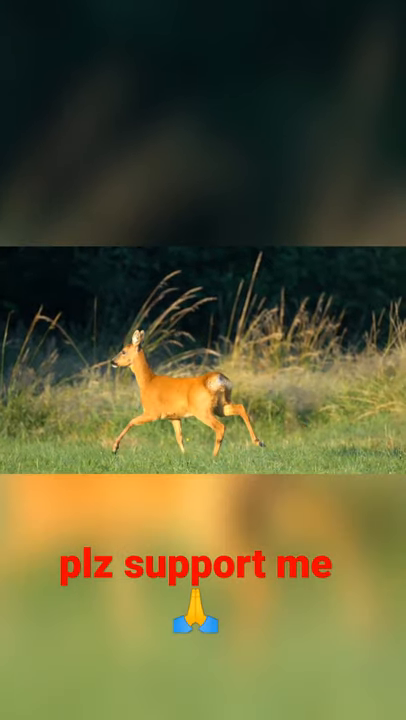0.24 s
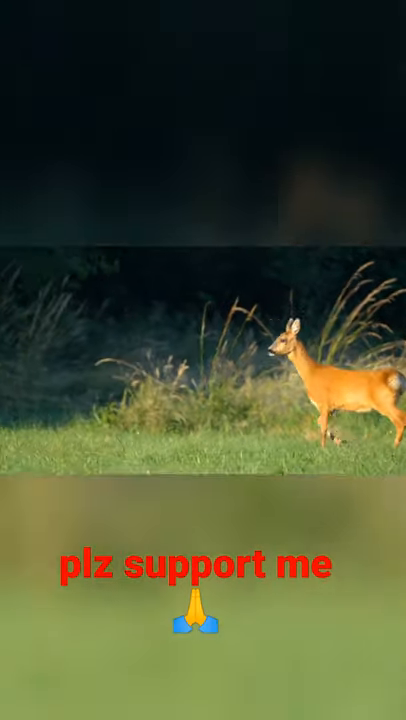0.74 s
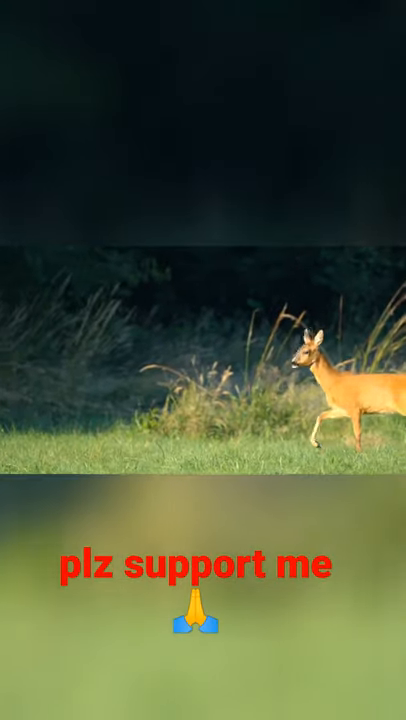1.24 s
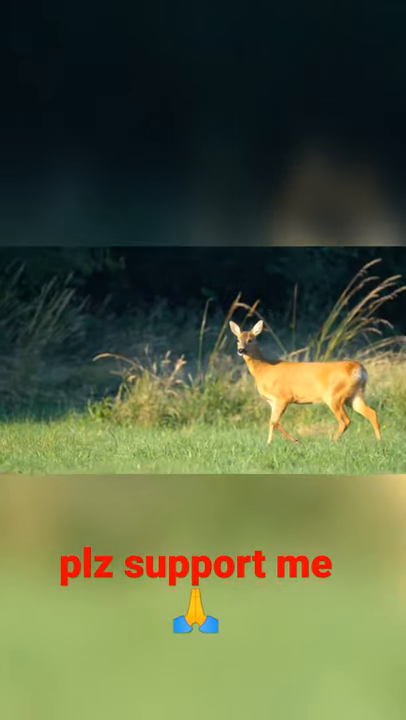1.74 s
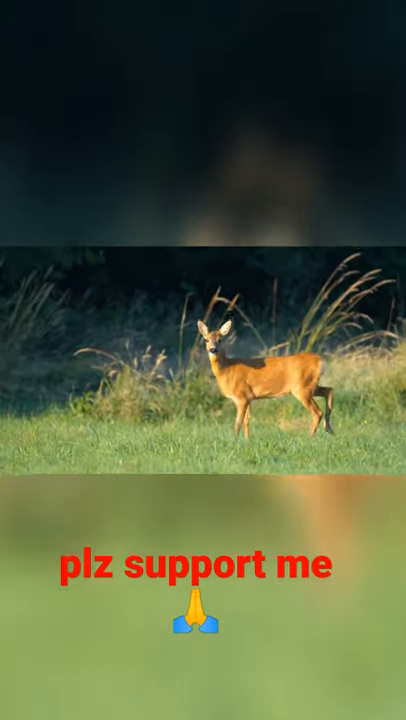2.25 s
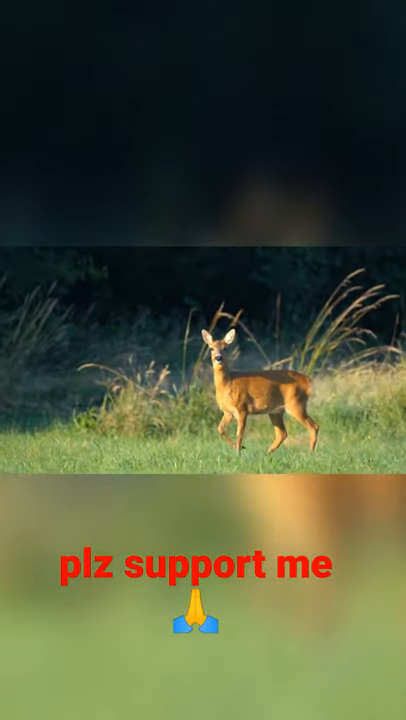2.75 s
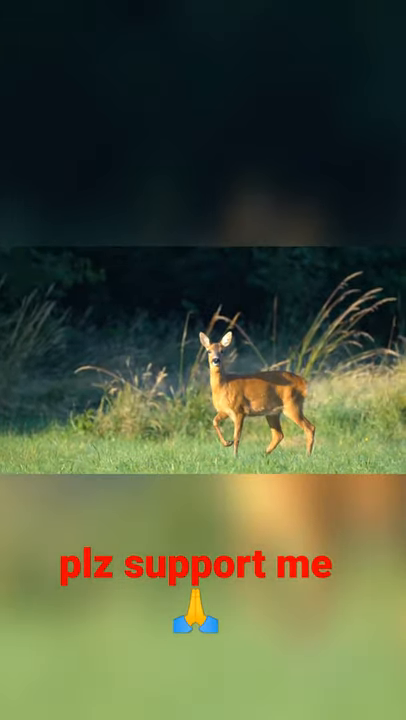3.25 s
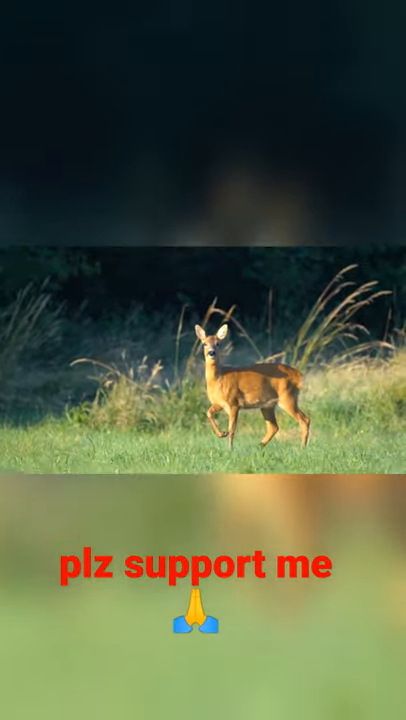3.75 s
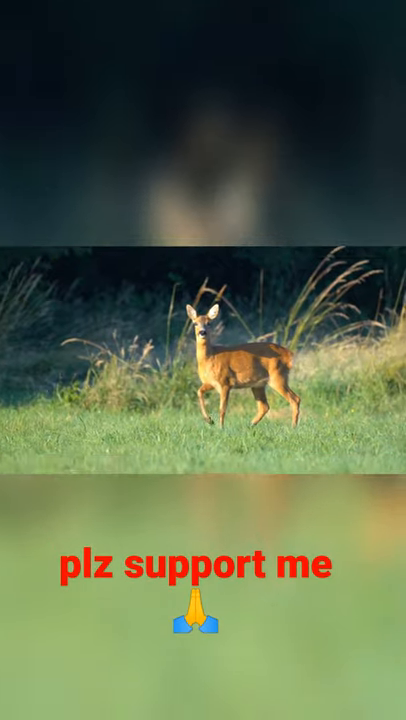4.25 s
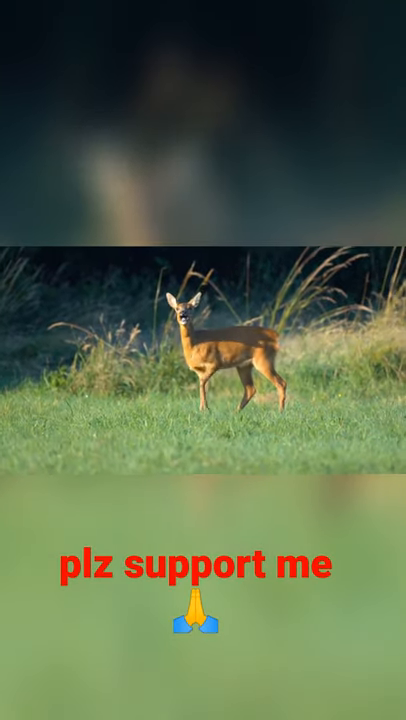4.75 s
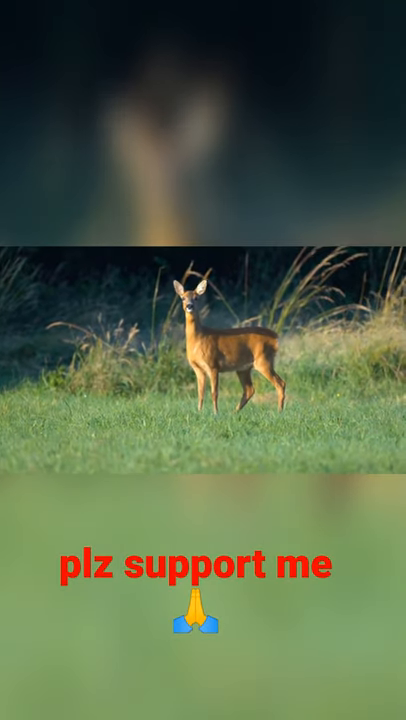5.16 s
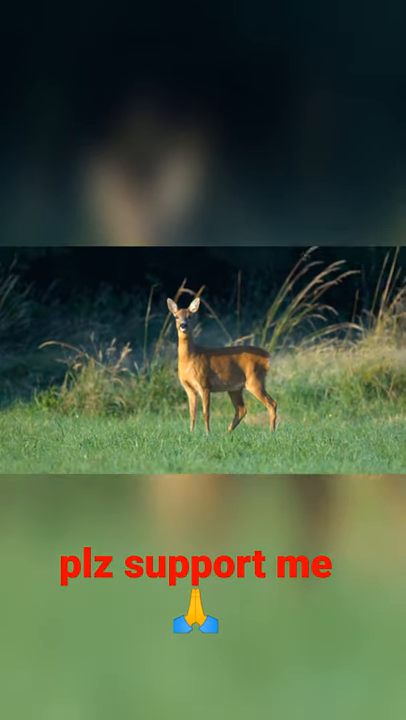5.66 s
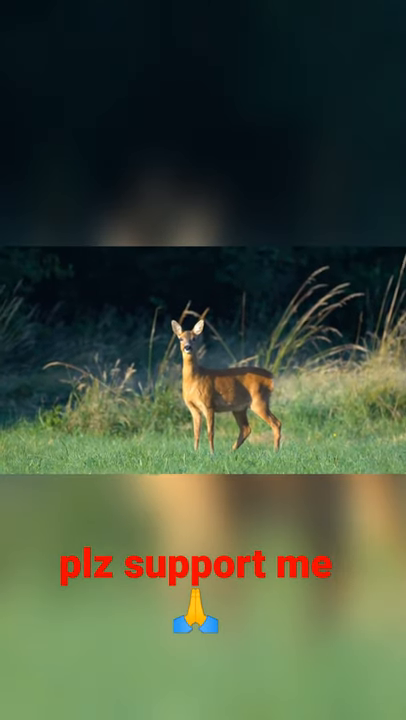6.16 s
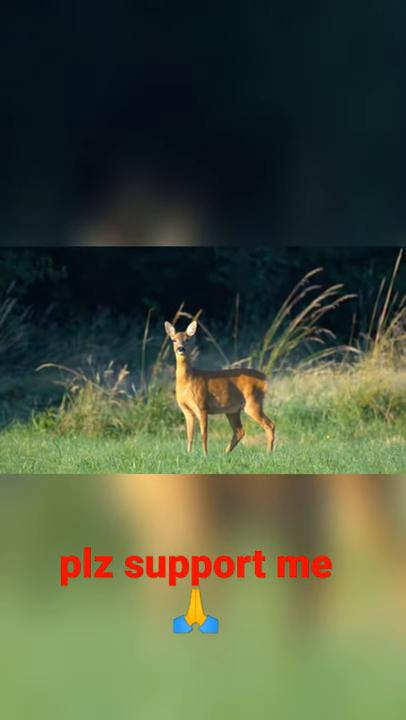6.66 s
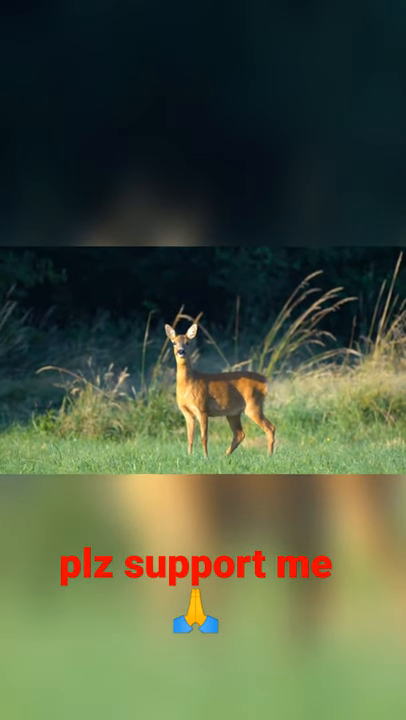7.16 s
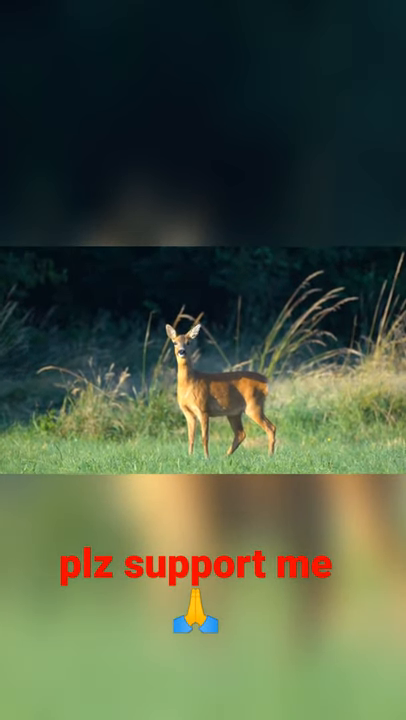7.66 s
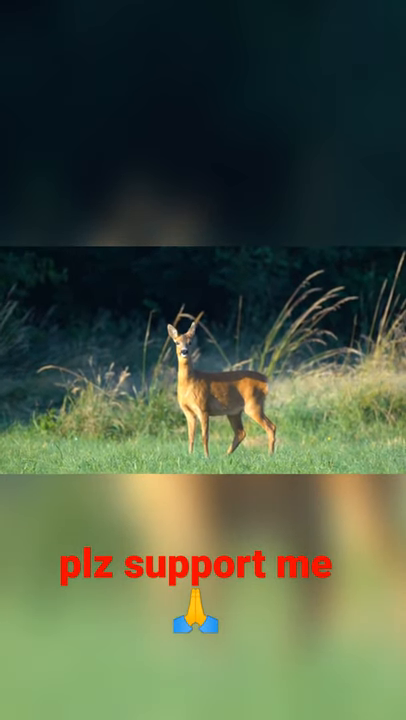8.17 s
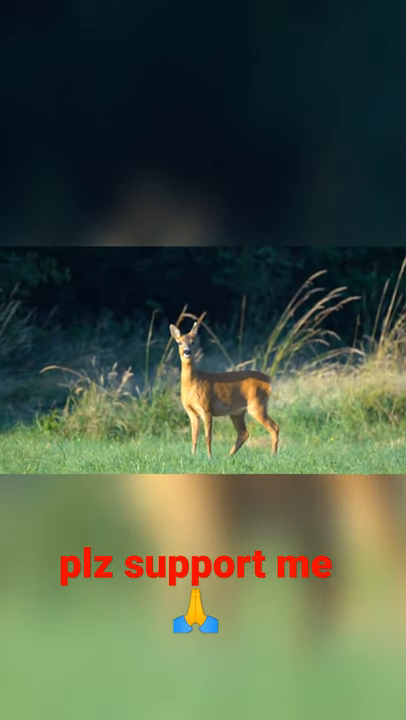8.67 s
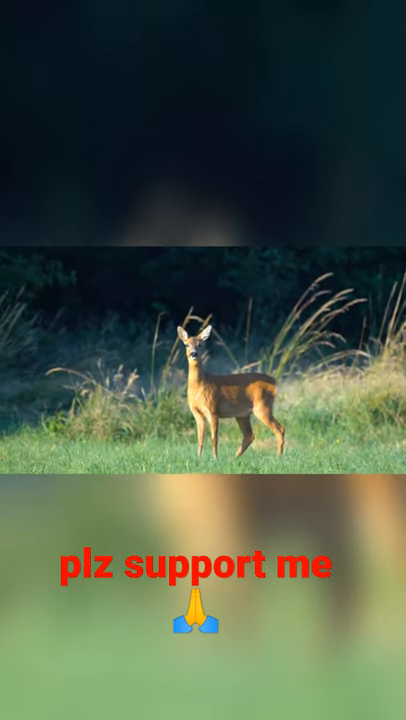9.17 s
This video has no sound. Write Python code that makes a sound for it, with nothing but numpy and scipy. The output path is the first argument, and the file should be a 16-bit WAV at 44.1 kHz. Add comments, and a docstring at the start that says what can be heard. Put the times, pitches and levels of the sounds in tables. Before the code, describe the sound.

Quiet open meadow with distant twittering birds and a few dry clicks, then a single rough roe deer bark with a long woodland echo.

```python
"""In a quiet meadow a roe deer gives one hoarse bark, and the forest edge throws it back.
The bark is made of sharp slaps, weak flutters and rushing noise that ring the throat.
Far songbirds whistle and trill: each note is a gliding tone, softened by short echoes.
A few dry clicks (sharp snaps in a brief soft blur of noise) and a faint rustle come close to the bark.
Shaped noise makes the soft hush of air, the microphone hiss and a low, distant rumble."""
import sys
import numpy as np
from scipy import signal
from scipy.fft import rfft, irfft, next_fast_len
from scipy.io import wavfile
from scipy.ndimage import uniform_filter1d

SR = 44100
rng = np.random.default_rng(int(sys.argv[2]) if len(sys.argv) > 2 else 0)


def wav_record(signal):
    """Record a signal, one row per channel, as 16-bit PCM in the file named by sys.argv[1]."""
    frames = np.transpose(np.atleast_2d(signal))
    bounded = np.clip(frames, -1, 1)
    # unit amplitude maps onto the largest positive 16-bit level
    quanta = np.round(bounded * 32767).astype(np.int16)
    wavfile.write(sys.argv[1], SR, quanta)


N = 414981  # length of the scene in samples

# How hard the deer barks. Each row: time in seconds, effort in dB.
BARK_EFFORT = [(4.556, -17), (4.578, -10.5), (4.59, -2.5), (4.63, -0.5), (4.695, .5), (4.75, -2.5),
               (4.79, -5.5), (4.815, -5)]
# Colour of one slap after the throat and the way over the grass. Each row: pitch in Hz, strength in dB.
SLAP_COLOUR = [(100, -52), (400, -29.5), (600, -21), (900, -12.5), (1200, -1), (2000, -4), (2800, -0.5),
               (4000, -13), (5600, -22), (7500, -36), (10000, -54), (12000, -65), (16000, -67)]
# Narrow resonances of the throat. Each row: pitch in Hz, width in Hz, boost in dB.
THROAT_RESONANCES = [(700, 85, 12.5), (1446.5, 33, 13), (1980, 160, 4.5), (2920, 70, 2.5)]
# Colour of the air rushing through the throat. Each row: pitch in Hz, strength in dB.
RUSH_COLOUR = [(500, -16.5), (1500, -1.5), (3000, 5.5), (5000, -6.5), (6800, -8.5), (8000, -14),
               (9200, -9.5), (10300, -11), (11500, -24), (16000, -31)]
# First reflections off the ground. Each row: delay in seconds, level in dB against the voice.
GROUND_REFLECTIONS = [(.00102, -15), (.00153, -14), (.00248, -20)]


def deer(slap_db=-16.3, flutter_db=-11, flutter_per_s=450, rush_db=-53, mouth_hz=1700, mouth_opening=.4,
         grass_db=-8, soak_hz=750, forest_db=9, side_db=-5.5):
    """Effort drives sharp slaps, weak flutters and rushing air; together they ring the throat."""
    t = np.arange(N) / SR
    opening = follow(BARK_EFFORT)
    effort = opening * (t >= BARK_EFFORT[0][0]) * (t <= BARK_EFFORT[-1][0])

    # flutters are single pulses at random moments, of random size and sign
    flutter = (rng.random(N) < flutter_per_s / SR) * (2 * rng.random(N) - 1)
    pulses = effort * (rasp() + gain_of(flutter_db) * flutter)
    voice = gain_of(slap_db) * through(pulses, -ping(SLAP_COLOUR, THROAT_RESONANCES))
    rush = effort * rng.standard_normal(N)
    voice = voice + gain_of(rush_db) * through(rush, ping(RUSH_COLOUR, THROAT_RESONANCES))

    # effort opens the mouth and lets out treble
    muffled = signal.sosfiltfilt(signal.butter(2, mouth_hz, fs=SR, output="sos"), voice)
    voice = muffled + opening ** mouth_opening * (voice - muffled)

    direct = voice + gain_of(grass_db) * through(voice, scatter(t60=.035, rise=.0006, same=.1))
    for delay, db in GROUND_REFLECTIONS:
        add(direct, delay, gain_of(db) * voice)
    # soft ground soaks up the low notes on the straight path
    direct = signal.sosfiltfilt(signal.butter(2, soak_hz, "high", fs=SR, output="sos"), direct)
    # the bark leans right, the forest's answer leans left
    return panned(direct, side_db) + gain_of(forest_db) * panned(forest(voice), side_db=4.5)


FOLD_HZ = 193.4  # slaps per second inside a surge, before jitter
# Surges in which the vocal folds catch and slap hard and evenly. Each row: start in seconds, number of slaps.
FOLD_SURGES = [(4.5892, 2), (4.6198, 2), (4.6347, 4), (4.6698, 2), (4.6889, 3), (4.7139, 2), (4.7387, 2),
               (4.7857, 2)]


def rasp(jitter=0.028, fade_db=1.0, uneven_db=0.5, loose_db=-6, loose_uneven_db=2.2, lag=.9):
    """Slaps of the vocal folds: hard and even in a surge, weaker and stumbling in between."""
    slaps, caught = np.zeros(N), np.zeros(N)
    for (s, count), chance in zip(FOLD_SURGES, rng.standard_normal((len(FOLD_SURGES), 5, 2))):
        for k, (late, size) in enumerate(chance[:round(count)]):
            when = s + k * (1 + jitter * late) / FOLD_HZ
            slaps[round(when * SR)] += gain_of(uneven_db * size - fade_db * k)
        # mark the surge, so that no loose slap falls inside it
        add(caught, s - .5 / FOLD_HZ, np.ones(round((count + .5) / FOLD_HZ * SR)))

    # each loose slap comes late by a random part of a cycle
    cycles = np.cumsum(1 + lag * rng.random(size=60))
    at = ((BARK_EFFORT[0][0] + cycles / FOLD_HZ - 1 / FOLD_HZ) * SR).astype(int)
    loose = gain_of(loose_db + loose_uneven_db * rng.standard_normal(len(at)))
    slaps[at] += (caught[at] == 0) * loose
    return slaps


# Colour of the forest's answer. Each row: pitch in Hz, strength in dB.
FOREST_COLOUR = [(300, -3.5), (460, 3.5), (590, 13), (700, 7.5), (850, 5.5), (1100, 4), (1450, 3.5),
                 (2000, 2.5), (3000, -7.5), (4200, -11.5), (8000, -8)]
# How slowly the near echoes die. Each row: pitch in Hz, seconds to fall by 60 dB.
FOREST_DECAY = [(300, 1.2), (700, 1.46), (1400, 1.3), (2200, 1.06), (3200, 0.86), (8000, 1.8)]


def forest(x, rise=0.059, rise_hz=1400, far_s=1.33, far_width=0.59, far_db=-33, far_top_hz=1500,
           same=0.6, size=512):
    """Echoes from the trees swell, treble first, and die; a far slope answers, faint and dull, a second later."""
    noise = pair(same, *rng.standard_normal((2, 5 * SR // 2)))
    hz, t, z = signal.stft(noise, SR, nperseg=size)
    column_hz = hz[:, None]
    # low notes return from deeper in the wood
    swell = 1 - np.exp(-(t / rise) ** 2 * (1 + (column_hz / rise_hz) ** 4))
    near = gain_of(-60 * t / read(FOREST_DECAY, hz)[:, None]) * swell
    far_swell = np.exp(-((t - far_s) / far_width) ** 2)
    far = gain_of(far_db) * far_swell / (1 + (column_hz / far_top_hz) ** 4)
    colour = gain_of(read(FOREST_COLOUR, hz))[:, None]
    tail = signal.istft(z * (near + far) * colour, SR, nperseg=size)[1]
    return through(x, tail / np.sqrt(SR))


# A phrase that the nearest bird repeats.
# Each row: seconds after the phrase starts, syllable, middle pitch in Hz, level in dB.
NEAREST_PHRASE = [(-.002, "sweep", 2960, -56.5), (.044, "buzz down", 4050, -58), (.124, "tick", 2560, -58),
                  (.184, "arch", 2204, -64.5)]
# When the phrase starts, in seconds.
PHRASE_TIMES = [3.195, 3.536]
# Single notes that stand out. Each row: start in seconds, syllable, middle pitch in Hz, level in dB.
SINGLE_NOTES = [(.015, "slur", 3740, -62), (0.309, "sag", 2870, -65), (0.523, "slur", 3620, -65),
                (0.669, "slur", 5100, -66.5), (.836, "lift", 2800, -67), (.94, "slur", 3800, -64),
                (.99, "buzz down", 5600, -68), (1.305, "slur", 2980, -62), (1.485, "buzz down", 5000, -65),
                (1.535, "lift", 3045, -66), (1.617, "buzz down", 5090, -62), (1.705, "scoop", 1880, -64),
                (1.78, "lift", 3050, -65), (1.869, "buzz down", 4970, -63), (1.94, "buzz up", 4460, -61.5),
                (2.377, "slur", 2415, -57.5), (2.43, "slur", 2380, -63), (2.554, "slur", 2475, -59.5),
                (2.615, "slur", 2350, -64), (2.84, "arch", 2125, -66), (3.025, "tick", 2650, -62),
                (3.086, "slur", 1940, -65), (3.9, "buzz down", 4480, -61.5), (3.93, "warble", 3390, -57.5),
                (4.099, "sweep", 2260, -58.5), (4.22, "warble", 2707, -58), (4.306, "slur", 1980, -63),
                (4.428, "buzz up", 5090, -59), (5.45, "buzz up", 5250, -69), (5.53, "slur", 5400, -65),
                (5.63, "warble", 4260, -61), (5.76, "slur", 4400, -63), (5.85, "buzz up", 4610, -66.5),
                (6.03, "lift", 3000, -66), (6.464, "warble", 4300, -65), (6.53, "slur", 3000, -67),
                (6.81, "lift", 3620, -69), (6.968, "lift", 3080, -64), (7.283, "slur", 3150, -67),
                (7.565, "sag", 3430, -66), (7.805, "sag", 3380, -64.5), (8.035, "sag", 2800, -64.5),
                (8.24, "buzz down", 3100, -69), (8.44, "sweep", 2700, -62.5), (8.505, "warble", 2810, -63),
                (8.658, "slur", 3000, -68), (8.739, "lift", 2770, -63.5), (8.915, "lift", 3600, -63),
                (9.1, "lift", 3080, -62), (9.14, "warble", 3225, -64), (9.225, "lift", 3540, -66)]
# How the birds lean between the ears. Each row: pitch in Hz, left level minus right level in dB.
BIRD_LEAN = [(1900, 1), (2200, -6.5), (2450, -5), (2750, 11.5), (3050, 11), (3500, 9.5), (3900, 1),
             (4300, -7), (5300, -6.5)]


def birds(direct_db=0, leaves_db=-8, trees_db=-8, ear_gap_s=0.00015):
    """Notes lean left or right with pitch, reach the farther ear later, and scatter in leaves and trees."""
    song = twitter()
    phrases = [(start + s, *note) for start in PHRASE_TIMES for s, *note in NEAREST_PHRASE]
    for s, name, hz, db in SINGLE_NOTES + phrases:
        add(song, s, gain_of(db) * syllable(name, hz))

    size = next_fast_len(N)
    hz = np.fft.rfftfreq(size, 1 / SR)
    lean_db = read(BIRD_LEAN, hz) * np.array([[.5], [-.5]])
    # the louder ear hears the note first
    earlier = np.exp(1j * np.pi * hz * ear_gap_s * np.tanh(lean_db))
    song = irfft(rfft(song, size) * gain_of(lean_db) * earlier, size)[:, :N]

    leaves = gain_of(leaves_db) * through(song, scatter(t60=.06, rise=.002, same=0))
    trees = gain_of(trees_db) * through(song, scatter(t60=0.6, rise=.0023, same=0.17))
    return gain_of(direct_db) * song + leaves + trees


# Bouts of softer song. Each row: start in seconds, end in seconds, lowest middle pitch in Hz,
# highest middle pitch in Hz, syllables per second, level in dB, syllables used.
SOFT_BOUTS = [(.45, 2.35, 3400, 5600, 14, -70, ("tick", "buzz up", "buzz down", "slur")),
              (.55, 2.5, 2300, 3200, 6, -68, ("tick", "slur", "warble")),
              (5.5, 6.5, 3700, 5000, 5, -73, ("tick", "buzz down")),
              (6, 7.9, 2900, 3700, 4.5, -72, ("lift", "slur", "buzz down"))]


def twitter(uneven_db=2):
    """Softer birds string their short syllables together at random."""
    song = np.zeros(N)
    chances = rng.random((len(SOFT_BOUTS), 40, 4))
    for (start, end, low_hz, high_hz, per_s, db, names), chance in zip(SOFT_BOUTS, chances):
        count = round((end - start) * per_s)
        for k, (late, kind, pitch, size) in enumerate(chance[:count]):
            name = names[int(kind * len(names))]
            note = syllable(name, low_hz * (high_hz / low_hz) ** pitch)
            level = gain_of(db + uneven_db * (2 * size - 1))
            add(song, start + (k + late) / per_s, level * note)
    return song


# The birds' syllables, by name. Each row: length in seconds, start pitch as a multiple of the middle pitch,
# end pitch as a multiple of the middle pitch, trill swings per second (0 = no trill).
BIRD_SYLLABLES = {"slur": (.05, 1.12, .89, 0), "tick": (.024, 1.12, .88, 0), "sag": (.1, 1.09, .96, 0),
                  "lift": (.07, .92, 1.04, 0), "sweep": (.058, .92, 1.42, 0), "arch": (.135, .83, .99, 0),
                  "scoop": (.14, 1.55, 1.42, 0), "buzz down": (.048, 1.19, .88, 120),
                  "buzz up": (.06, .89, 1.11, 118), "warble": (.085, 1.12, .94, 62)}


def syllable(name, hz):
    """One of the birds' syllables: a glide, with or without trill, around a given middle pitch."""
    length, start, end, trill_per_s = BIRD_SYLLABLES[name]
    return whistle(length, hz * np.array([start, 1, end]), trill_per_s)


def whistle(length, pitches, trill_per_s, swing_hz=210, waver_db=2.5, unsteady=0.0059):
    """One bird note of rms 1: it glides through three pitches, and a trill swings pitch and strength."""
    t = np.arange(round(length * SR)) / SR
    noises = rng.standard_normal((2, SR // 2))
    shake, waver = (evened(uniform_filter1d(noise, 200))[:len(t)] for noise in noises)
    trill = np.sin(2 * np.pi * trill_per_s * t)
    glide = np.polyval(np.polyfit([0, .5, 1], pitches, 2), t / length)
    hz = glide * (1 + unsteady * shake) + swing_hz * trill
    strength = signal.windows.tukey(len(t), .4) * gain_of(waver_db * (waver + trill / 2))
    return evened(strength * np.sin(2 * np.pi * np.cumsum(hz) / SR))


# Dry clicks close by. Each row: time in seconds, peak of the snap in dB before it is coloured and panned.
CLICK_TIMES = [(3.1229, -39), (3.5752, -32), (3.6578, -28), (3.704, -32), (3.8066, -33), (3.8097, -28),
               (4.0602, -39), (4.0897, -41), (4.169, -38)]
# Colour of a click. Each row: pitch in Hz, strength in dB.
CLICK_COLOUR = [(200, -20), (900, 2), (2000, -4.5), (4500, -1.5), (9000, 0.5), (15000, -0.5)]


def clicks(blur_db=-19, blur_s=.002, spread_db=-5, side_db=-4):
    """Each click is a sharp snap with a brief soft blur of noise around it."""
    t = np.arange(-SR // 50, SR // 50) / SR
    snaps = np.zeros(N)
    for (s, db), noise in zip(CLICK_TIMES, rng.standard_normal((len(CLICK_TIMES), len(t)))):
        # noise fades in before the snap and out after it
        blur = gain_of(blur_db) * noise * np.exp(-abs(t) / blur_s)
        add(snaps, s + t[0], gain_of(db) * ((t == 0) + blur))
    snaps = through(snaps, ping(CLICK_COLOUR))
    spread = through(snaps, scatter(t60=0.029, rise=0.0002, same=0))
    return panned(snaps, side_db) + gain_of(spread_db) * spread


def rustle(level_db=-73, middle_s=4.1, width_s=1.0, clump_db=5, low_hz=3000):
    """A faint, uneven dry rustle goes with the clicks: high noise whose strength comes in clumps."""
    t = np.arange(N) / SR
    slow = uniform_filter1d(uniform_filter1d(rng.standard_normal(N), 1500), 700)
    clumps = gain_of(clump_db * evened(slow))
    noise = pair(0.72, *rng.standard_normal((2, N)))
    fizz = signal.sosfilt(signal.butter(2, low_hz, "high", fs=SR, output="sos"), noise)
    swell = np.exp(-((t - middle_s) / width_s) ** 2)
    return gain_of(level_db) * swell * evened(fizz * clumps)


# Far birds too faint to tell apart. Each row: time in seconds, level in dB.
CHORUS_LEVEL = [(0, -79), (.7, -74), (1.5, -73), (2.3, -76), (3, -81), (5, -82), (6.2, -78), (7, -84),
                (9.4, -83)]


def chorus(count=330, low_hz=2600, high_hz=5200, glide=.18):
    """Random short chirps from deep in the trees, blurred by their echoes."""
    song = np.zeros(N)
    for when, length, pitch, *bends in rng.random((count, 6)):
        centre_hz = low_hz * (high_hz / low_hz) ** pitch
        pitches = centre_hz * (1 + glide * (2 * np.array(bends) - 1))
        add(song, when * N / SR, whistle(0.0249 + 0.027 * length, pitches, 0))
    echoes = through(song, scatter(t60=.12, rise=.002, same=0))
    return follow(CHORUS_LEVEL) * evened(echoes)


# Swells of a low, distant rumble. Each row: middle in seconds, half width in seconds, level in dB.
RUMBLE_SWELLS = [(.52, .25, -84), (5.6, .3, -90), (8.15, .2, -93)]


def rumble(low_hz=52, high_hz=72, rest_db=-100):
    """A narrow band of bass noise from far away that swells now and then."""
    t = np.arange(N) / SR
    level = gain_of(rest_db)
    for s, width, db in RUMBLE_SWELLS:
        level = level + gain_of(db) * np.exp(-((t - s) / width) ** 2)
    band = signal.butter(2, [low_hz, high_hz], "band", fs=SR, output="sos")
    bass = signal.sosfilt(band, pair(0.95, *rng.standard_normal((2, N))))
    return level * evened(bass)


# Colour of the still air with the microphone's hiss. Each row: pitch in Hz, strength in dB.
AIR_COLOUR = [(20, -43), (45, -13), (62, -14), (90, -7.5), (170, -11), (300, -2.5), (480, 1.5), (850, 1),
              (1050, 4), (1400, -0.5), (2600, 0), (5000, -6), (10000, -7), (15500, -9)]
# Slow swell of the air; only the distance from the middle value counts. Each row: time in seconds, level in dB.
AIR_SWELL = [(0, -69), (.6, -67.5), (2, -68), (4.3, -68.5), (5.6, -68), (6.4, -70), (8.8, -70), (9.41, -68)]
# How alike the two ears are. Each row: pitch in Hz, likeness from 0 (unrelated) to 1 (the same).
AIR_LIKENESS = [(30, 0.63), (100, 0.83), (250, 0.72), (1000, 0.15), (3000, 0.073), (6000, 1), (15000, 1)]


def air(level_db=-63.0, patchy_db=1.0, sway=1.0, sway_top_hz=2500, flicker_db=0.57, size=2048):
    """A distant hush of noise that swells slowly under steadier hiss."""
    hop = size // 4
    t, hz = np.arange(N // hop + 5) * hop / SR, np.fft.rfftfreq(size, 1 / SR)
    a, b, c, d, patches = rng.standard_normal((len(t), len(hz), 5)).T
    patches = evened(uniform_filter1d(uniform_filter1d(patches, 14, 0), 12, 1))
    s, db = np.transpose(AIR_SWELL)
    swell = sway * np.interp(t, s, db - np.median(db))
    # swells and patches fade out in the treble, where the small flicker is up to twice as strong
    outdoors = 1 / (1 + (hz[:, None] / sway_top_hz) ** 2)
    flicker = flicker_db * evened(uniform_filter1d(rng.standard_normal(len(t)), size=7))
    changes_db = outdoors * (swell + patchy_db * patches) + (2 - outdoors) * flicker
    z = pair(read(AIR_LIKENESS, hz)[:, None], a + 1j * b, c + 1j * d)
    z = z * gain_of(read(AIR_COLOUR, hz)[:, None] + changes_db)
    hush = signal.istft(z, nperseg=size, noverlap=size - hop)[1][:, :N]
    return gain_of(level_db) * evened(hush)


def scatter(t60, rise, same):
    """Short diffuse reflections: noise that rises and falls by 60 dB in t60 seconds, left energy 1."""
    t = np.arange(SR) / SR
    noise = pair(same, *rng.standard_normal((2, SR)))
    tail = noise * gain_of(-60 * t / t60) * (1 - np.exp(-t / rise))
    return tail / np.linalg.norm(tail[0])


def ping(colour, resonances=(), size=4096):
    """A pulse of peak 1 with a given colour and resonances, which rings only after it is struck."""
    hz = abs(np.fft.fftfreq(size, 1 / SR))
    db = read(colour, hz) + sum(g / (1 + (2 * (hz - f) / w) ** 2) for f, w, g in resonances)
    # this choice of phase puts the energy as early as the colour allows
    spectrum = np.exp(np.conj(signal.hilbert(np.log(gain_of(db)))))
    pulse = np.fft.ifft(spectrum).real[:size // 2]
    return pulse / abs(pulse).max()


def through(x, response):
    """Lets a sound ring through a response (convolution), channel by channel."""
    return signal.fftconvolve(np.atleast_2d(x), np.atleast_2d(response), axes=1)[:, :N]


def pair(same, a, b):
    """Two channels of a given likeness from two unrelated noises."""
    same = np.clip(same, -1, 1)
    return np.array([a, same * a + np.sqrt(1 - same ** 2) * b])


def panned(x, side_db):
    """Sets the left channel side_db above the right."""
    return x * gain_of([[side_db / 2], [-side_db / 2]])


def add(mix, s, sound):
    """Lays a sound into the mix at time s in seconds."""
    part = mix[..., round(s * SR):][..., :sound.shape[-1]]
    part += sound[..., :part.shape[-1]]


def follow(curve):
    """Gain at every sample from points of seconds and dB."""
    return gain_of(np.interp(np.arange(N) / SR, *np.transpose(curve)))


def read(points, hz):
    """Joins points of Hz and value by lines on a log-frequency axis."""
    f, value = np.transpose(points)
    return np.interp(np.log(hz + 1), np.log(f + 1), value)


def gain_of(db):
    """Decibels to a factor."""
    return 10 ** (np.asarray(db) / 20)


def evened(x):
    """Scales to an average strength (rms) of 1."""
    return x / np.sqrt(np.mean(x ** 2) + 1e-20)


def scene():
    """The meadow with all its sounds."""
    return deer() + birds() + chorus() + clicks() + rustle() + rumble() + air()


def record(dry, edge_hz=15800):
    """The recorder's band limit: a steep filter takes away what lies above the edge."""
    lowpass = signal.firwin(801, edge_hz, window=("kaiser", 9), fs=SR)
    return signal.oaconvolve(dry, lowpass[None], "same")


dry = scene()
out = record(dry)
wav_record(out)
```